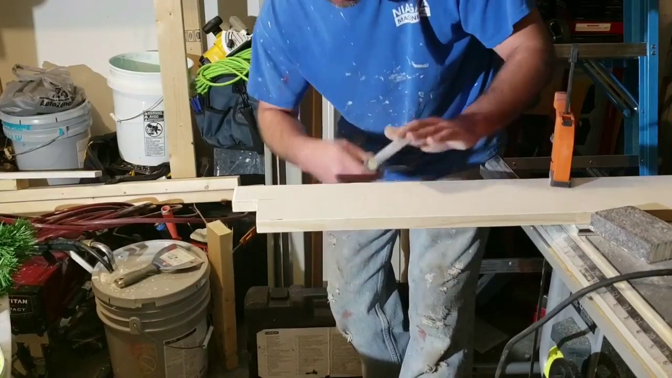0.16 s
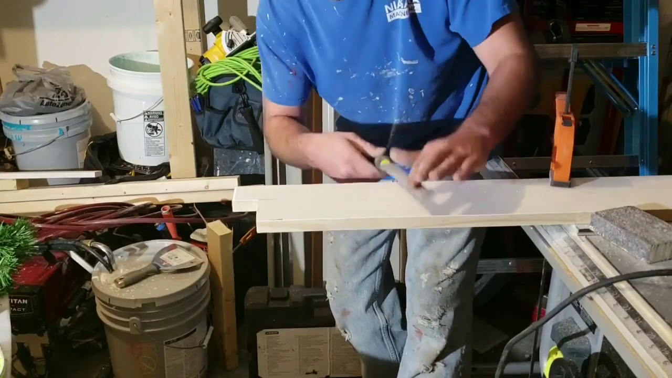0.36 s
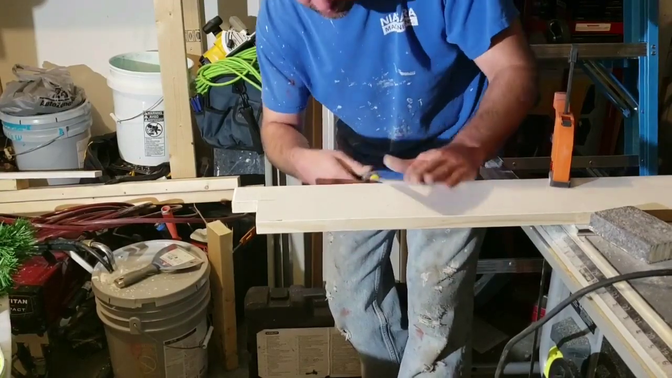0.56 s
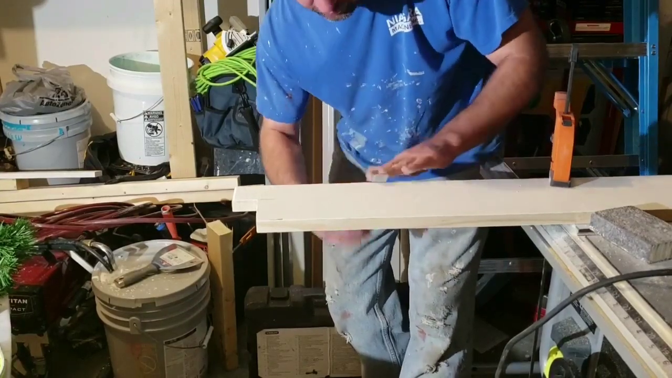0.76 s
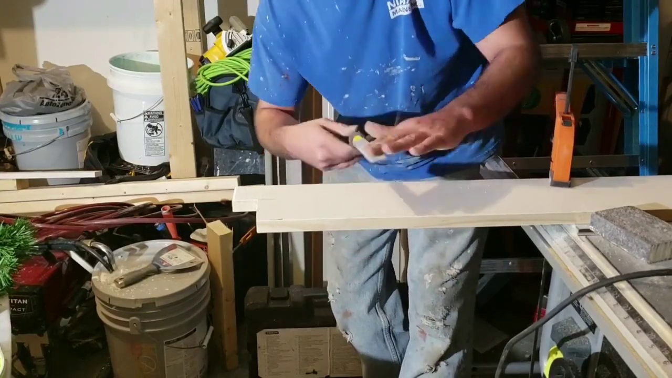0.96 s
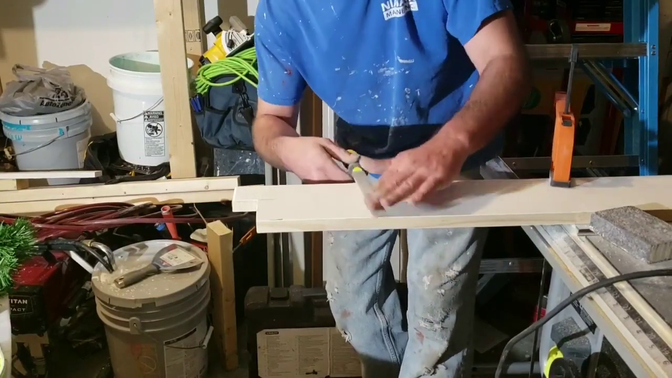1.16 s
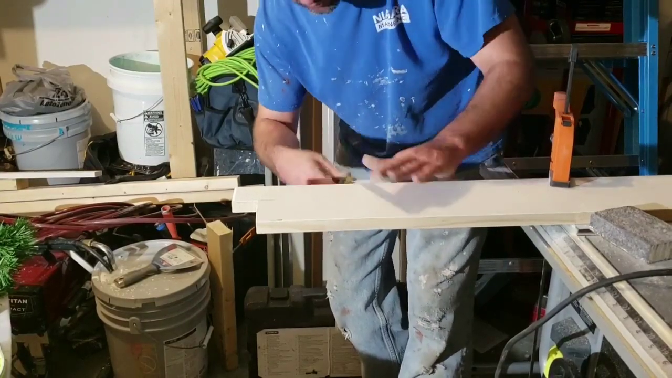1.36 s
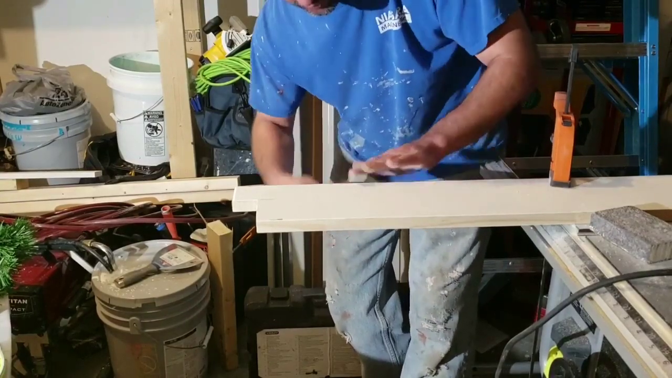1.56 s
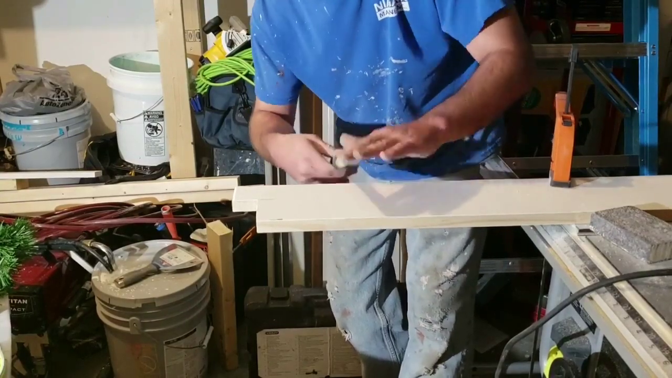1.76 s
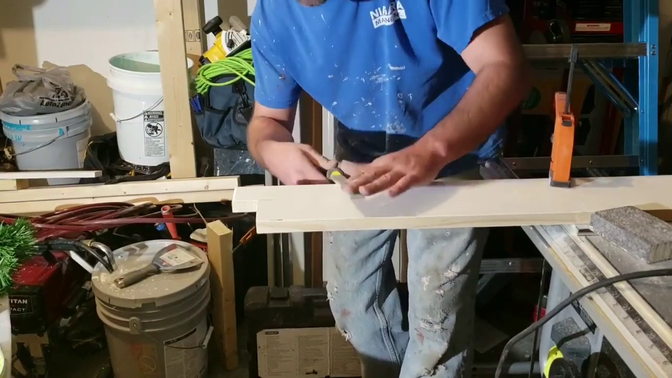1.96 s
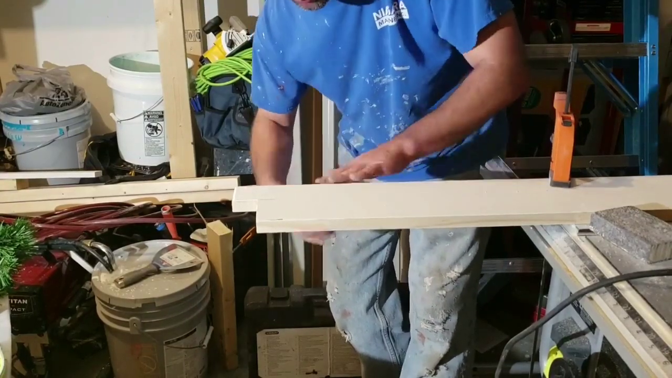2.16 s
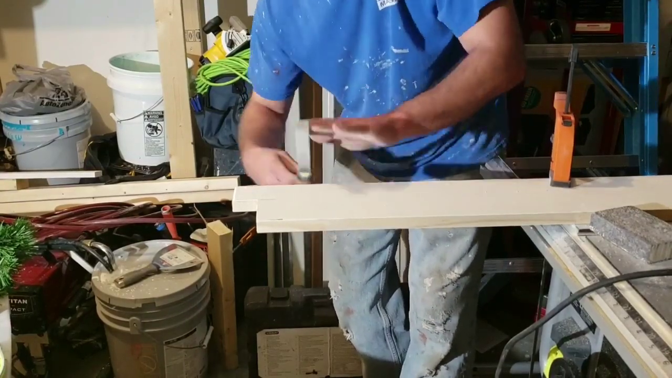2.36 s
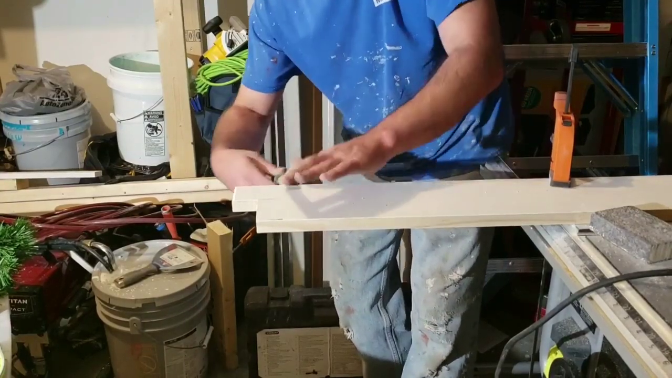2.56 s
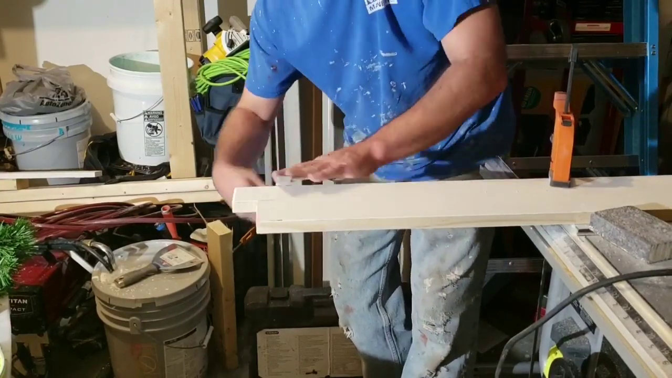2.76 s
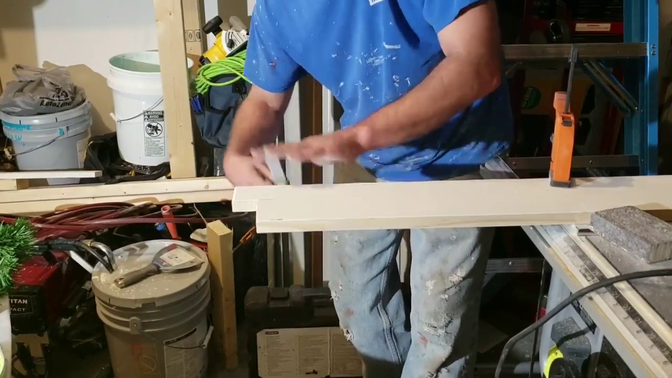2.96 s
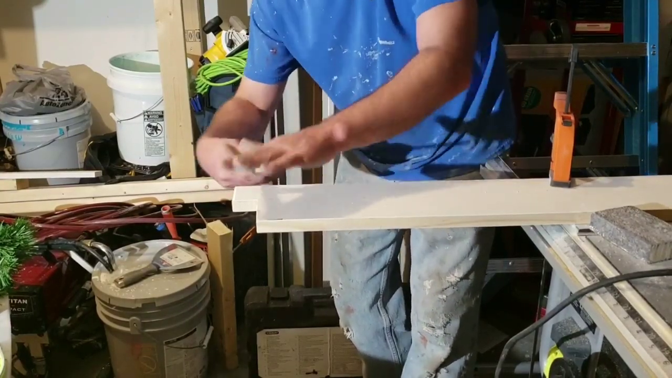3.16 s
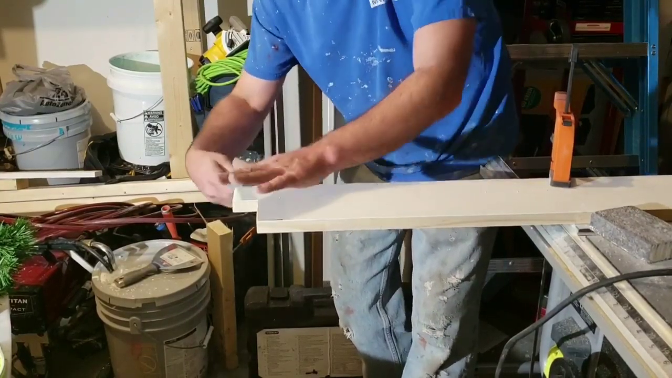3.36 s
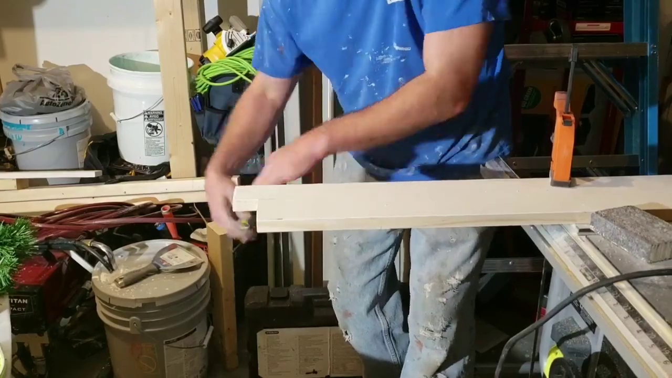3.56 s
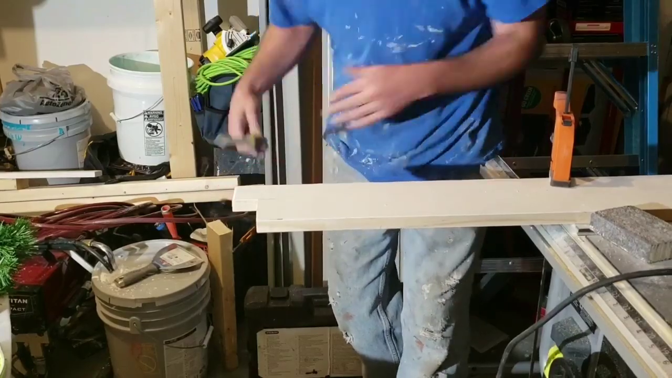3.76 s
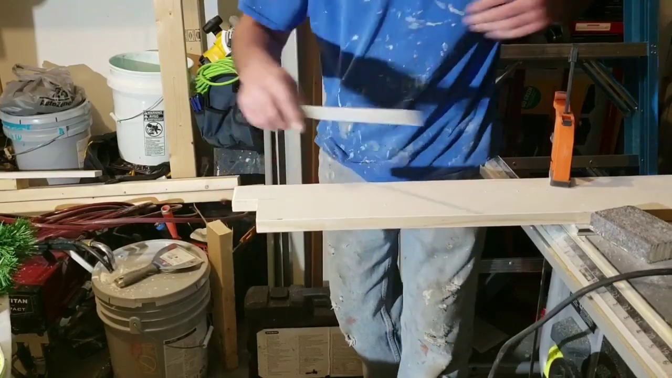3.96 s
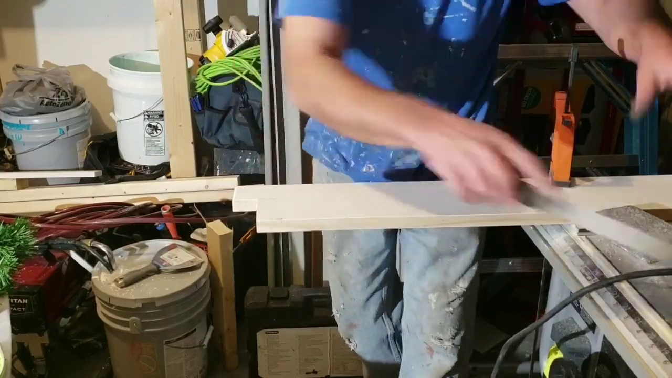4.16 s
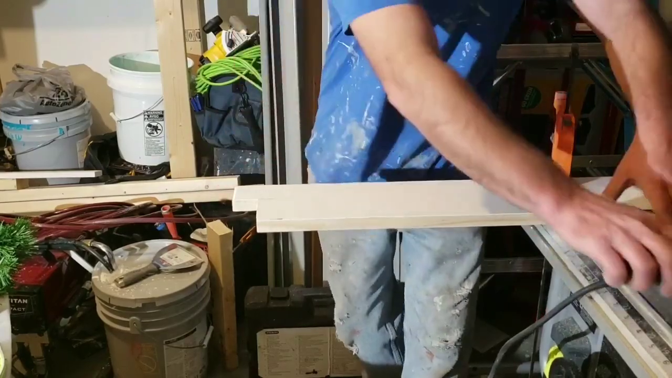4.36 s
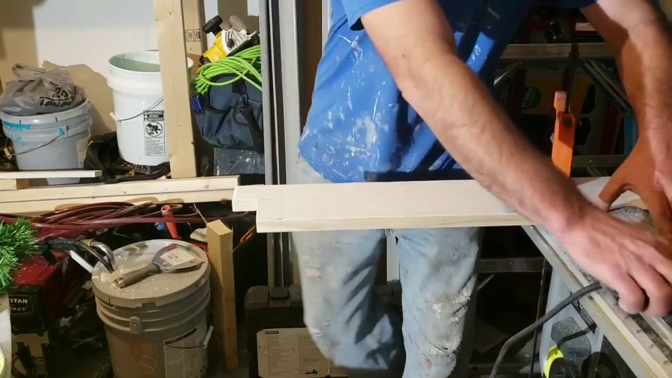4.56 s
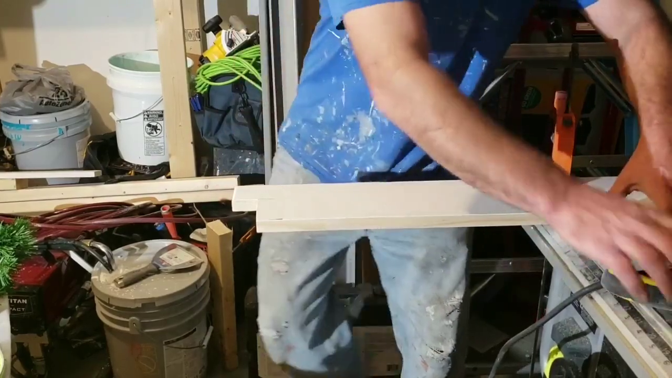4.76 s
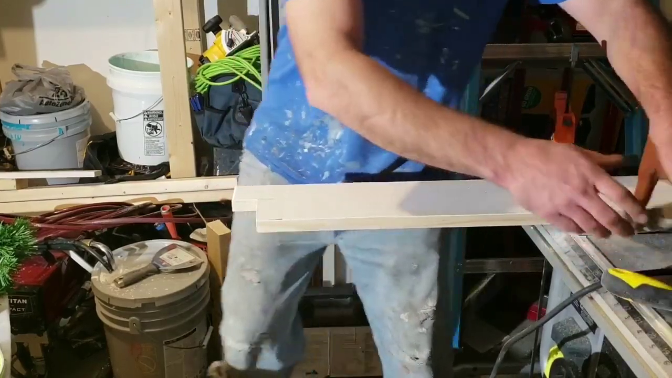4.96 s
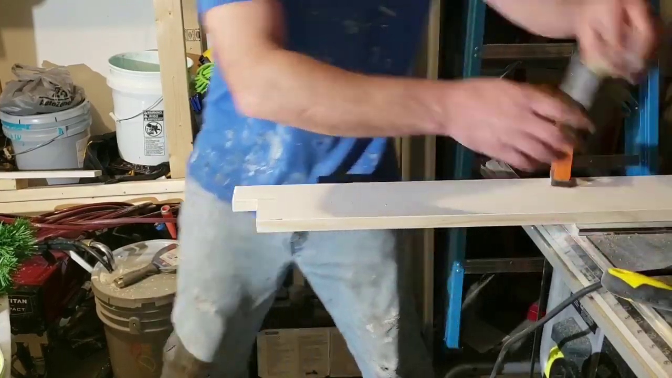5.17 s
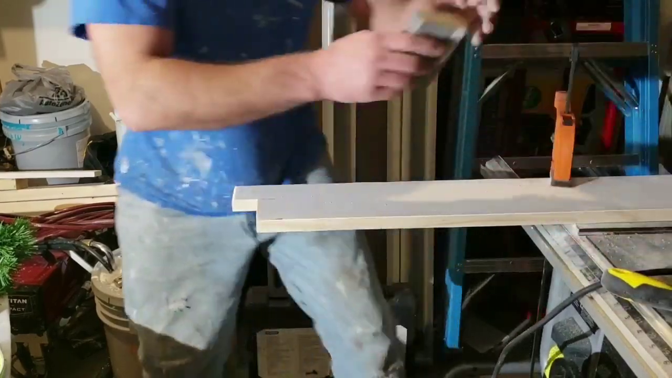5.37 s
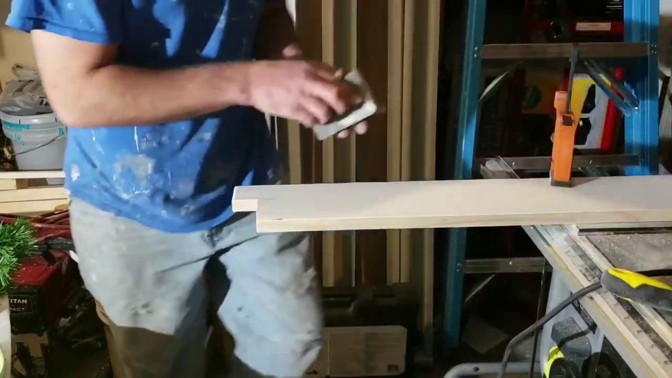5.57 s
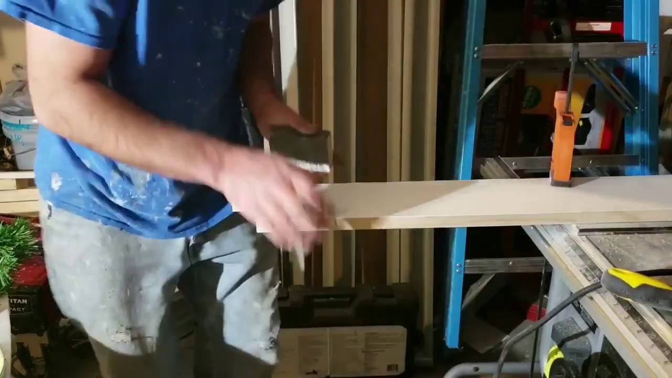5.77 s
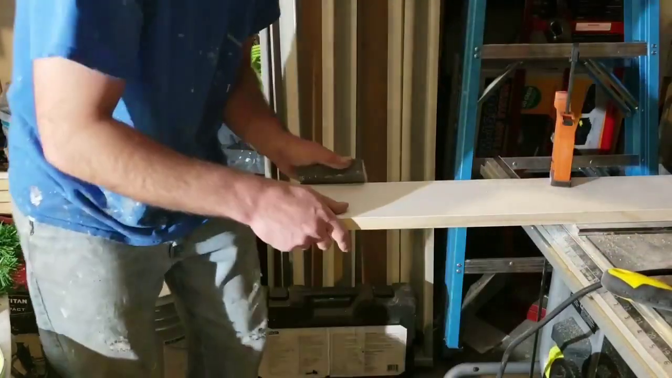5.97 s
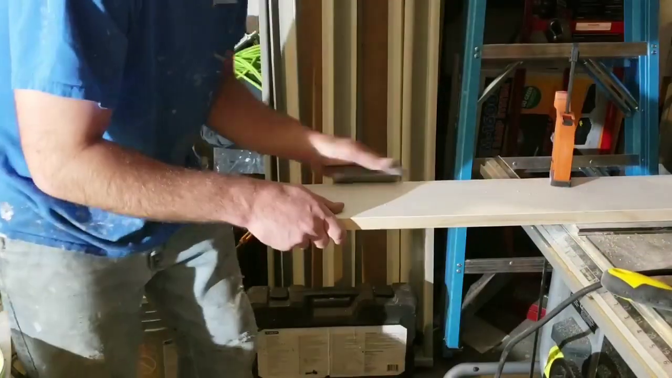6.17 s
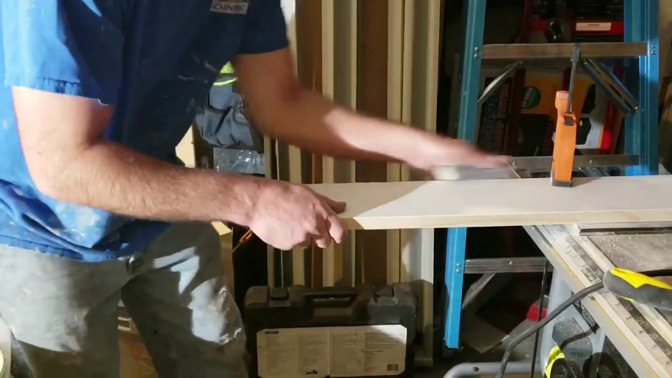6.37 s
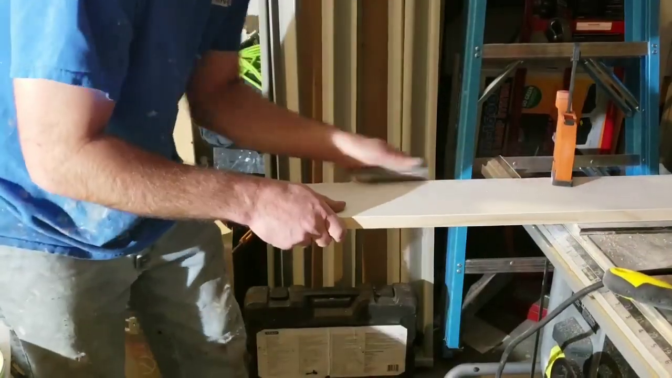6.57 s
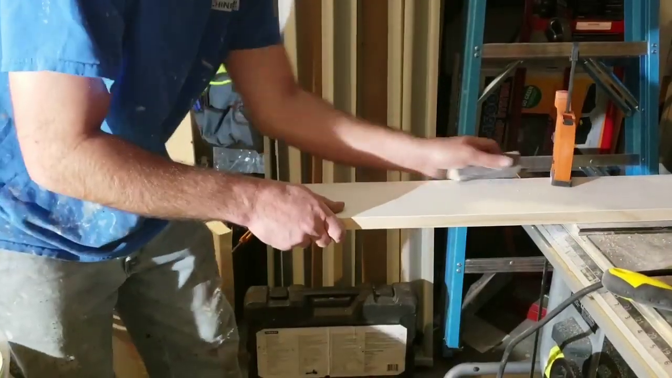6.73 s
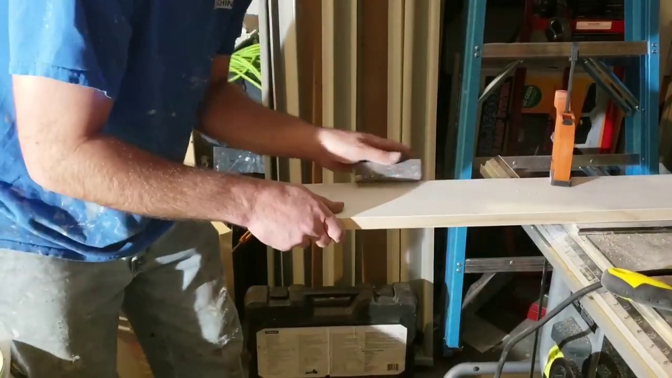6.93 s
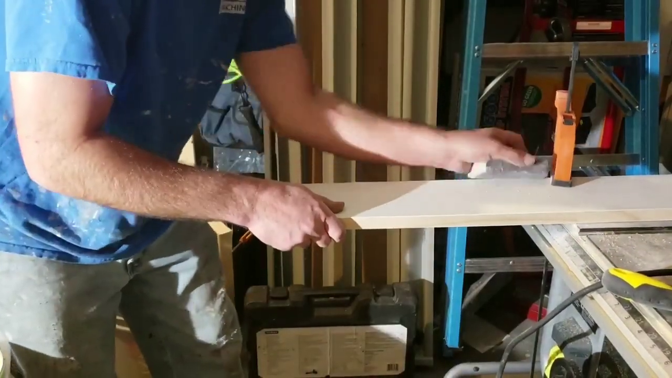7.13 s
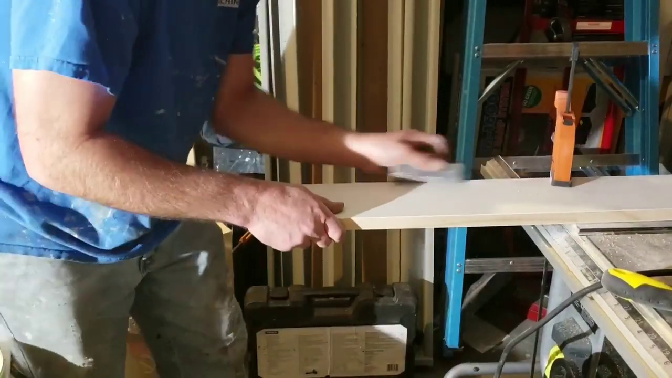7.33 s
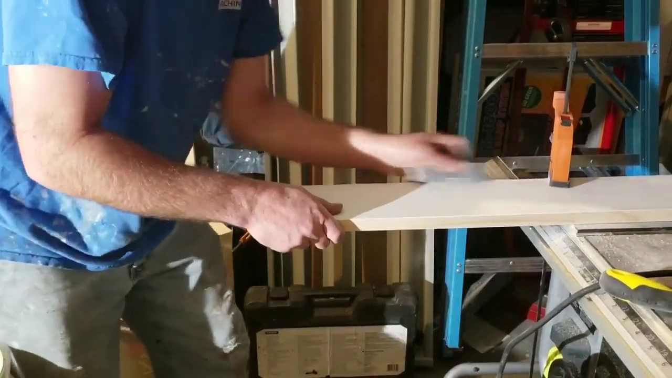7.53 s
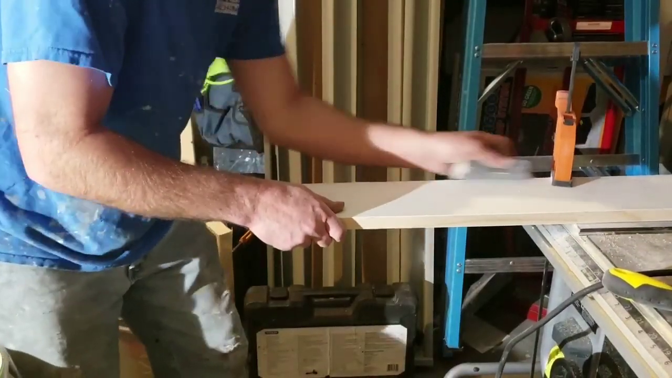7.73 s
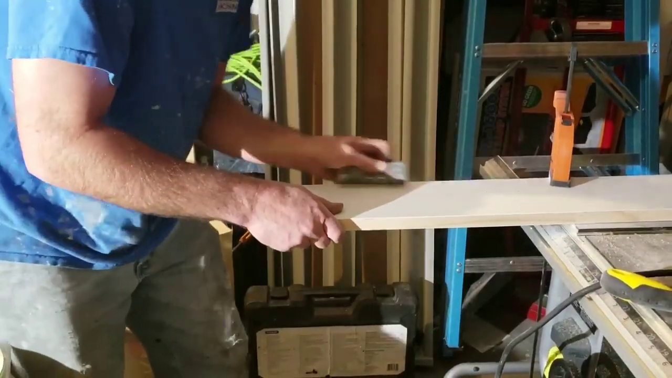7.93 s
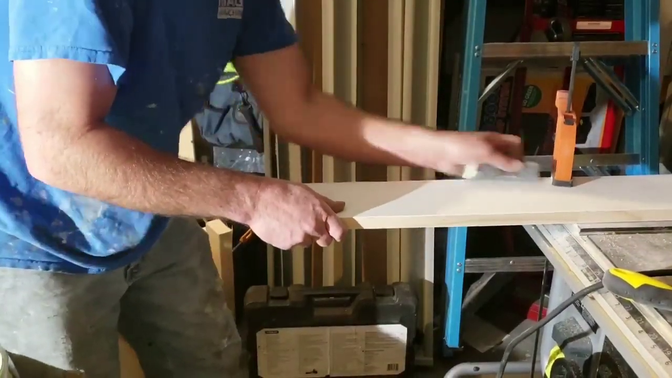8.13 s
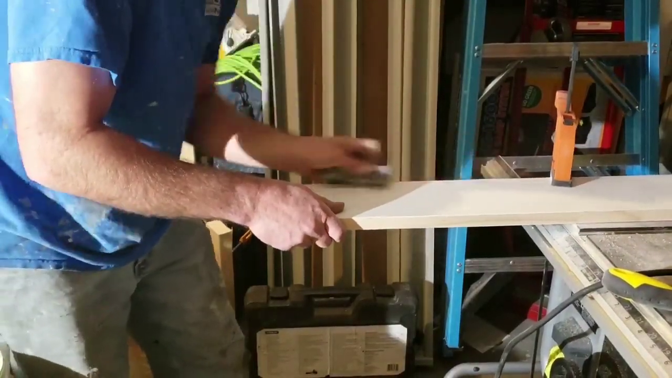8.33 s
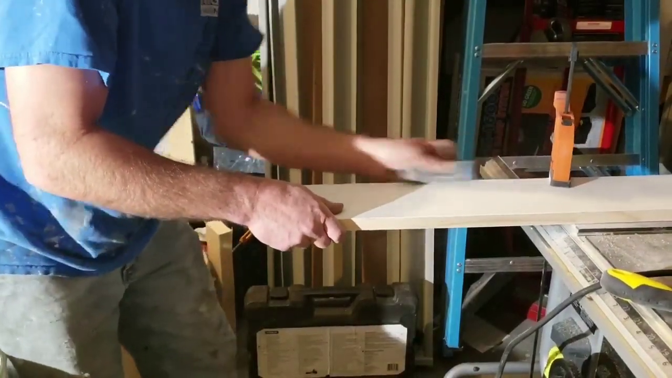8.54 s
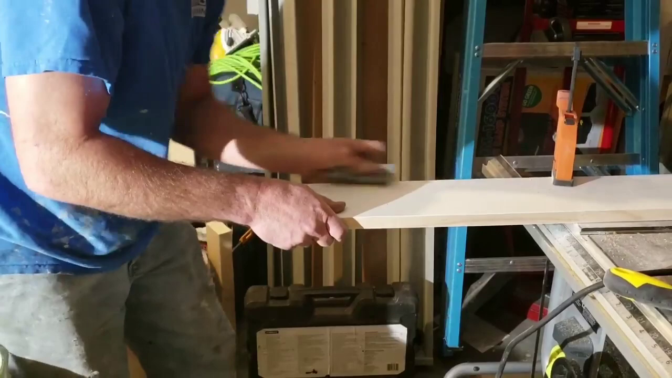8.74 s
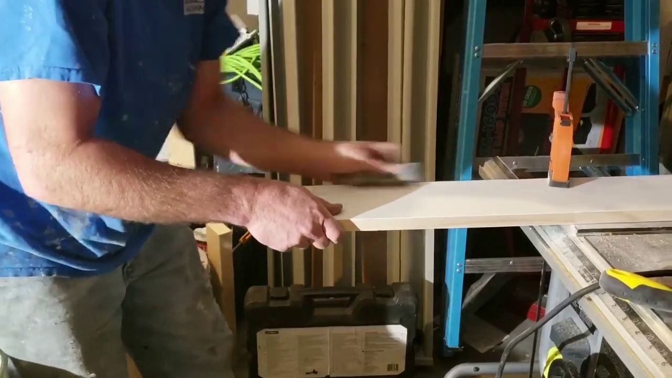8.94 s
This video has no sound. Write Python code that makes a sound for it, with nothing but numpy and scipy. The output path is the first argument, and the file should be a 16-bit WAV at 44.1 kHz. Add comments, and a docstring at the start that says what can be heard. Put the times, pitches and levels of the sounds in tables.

```python
"""Sanding a board in a garage

An abrasive stick is pushed six times along the edge of a clamped board, then dropped on the bench.
A sanding block is picked up and swept quickly to and fro over the board's face.
Grit catches the wood fibres and makes the board ring and sometimes chatter. A far-off engine hums."""
import sys
import numpy as np
from scipy import signal
from scipy.fft import rfft, irfft, next_fast_len
from scipy.io import wavfile
from scipy.ndimage import uniform_filter1d, map_coordinates

SR = 44100
rng = np.random.default_rng(int(sys.argv[2]) if len(sys.argv) > 2 else 0)


def inscribe(sig):
    """Save sig as 16-bit PCM at rate SR to the path in sys.argv[1].

    A 1-D sig is mono; a 2-D sig holds one channel per row.
    Samples are clipped to [-1, 1] before scaling.
    """
    pcm = np.round(np.clip(np.atleast_2d(sig).T, -1, 1) * 32767)
    wavfile.write(sys.argv[1], SR, pcm.astype(np.int16))


N = 396889
TIME = np.arange(N) / SR
FFT_SIZE = next_fast_len(N + SR)
FREQ = np.arange(FFT_SIZE // 2 + 1) * SR / FFT_SIZE + 1e-3


# The board's overall tone: pitch_hz, level_db
BOARD_TONE = [(150, -40), (240, -19.5), (480, -9.5), (800, -21.5), (1080, -12.5), (1600, -11.5),
              (4400, -16.5), (5500, -20.5), (7000, -28.5), (8000, -31.5), (9500, -28.5), (12000, -24),
              (15000, -30)]
# The pitches at which the board rings: pitch_hz, width_hz, level_db
BOARD_RINGS = [(250.6, 26.5, -4.5), (344.5, 58, -1.5), (462, 65, -8), (596, 83, -8), (720, 140, -8),
               (848, 53, -4), (1310, 100, -12.5), (1804, 42, -5), (2080, 99, -6), (2300, 90, -6.5),
               (2500, 51, -11.5), (2950, 21, -25), (3050, 35, -17), (3880, 180, -19.5), (4280, 70, -11),
               (6590, 460, -19)]
# Pushes of the stick (the last three columns are added to the level):
# start_s, creep_before_s, rise_s, hold_s, level_db, first_bite_db, body_db, hiss_db
PUSHES = [(0.0, .02, 0.038, 0.053, -24, -6, 3, -8), (.696, 0.13, .092, .054, -25.5, -7.5, 1.5, -3.5),
          (1.433, 0.015, 0.046, .105, -26, -8, 2, -3.5), (2.066, 0.027, 0.11, 0.083, -28, -14.5, -1, -4),
          (2.745, 0.024, 0.096, 0.062, -25.5, -20, -0.5, -6),
          (3.445, 0.043, .092, 0.083, -24, -19.5, -1, -3.5)]


def sanding_stick(creep_db=-45.5, bite_s=0.026, press_db_per_s=7.5, hiss_growth=1.19):
    """Grit scrapes the board's edge: each push creeps, bites, presses harder and lets go."""
    rasp_fade_db_per_s, body_fade_db_per_s = 340, 228
    levels = np.zeros((3, N))
    for start, creep, rise, hold, db, bite_db, body_db, hiss_db in PUSHES:
        full, end = start + rise, start + rise + hold
        lean_db = press_db_per_s * hold / 2
        stages = [start - bite_s, start, full, end]
        force_db = np.interp(TIME, stages, [creep_db - db, bite_db, -lean_db, lean_db])
        contact = np.clip((TIME - start + creep) / bite_s + 1, 0, 1)
        released_s = np.maximum(TIME - end, 0)
        low_db = force_db - body_fade_db_per_s * released_s + body_db - 1
        rasp_db = force_db - rasp_fade_db_per_s * released_s
        levels += contact * undb(db) * undb([low_db, rasp_db, hiss_growth * rasp_db + hiss_db])
    body_level, rasp_level, hiss_level = levels * undb(1.57 * wander(34.85))
    body_level *= undb(2 * wander(45.04))
    snaps = grit(per_s=5000, spread_db=2, rough_db=2)
    wood = tone(BOARD_TONE, BOARD_RINGS) * above(140)
    bands = below(1000), above(1000) * below(6000), above(6000)
    body, rasp, hiss = (unit(shape(snaps, wood * band)) for band in bands)
    # While one pitch chatters, the board's other low pitches give way a little.
    chattering = np.clip(sum(swell(s, length) for s, length, *_ in JUDDERS), 0, 1)
    body_level *= 1 - 0.17 * chattering
    return body_level * bend(body, depth=.025) + rasp_level * bend(rasp, depth=.006) + hiss_level * hiss


# The sandpaper's overall tone: pitch_hz, level_db
PAPER_TONE = [(250, -44), (380, -3), (520, -29), (680, -4.5), (880, 2.5), (1250, -4.5), (2300, 6),
              (3300, -1), (4600, -1), (5700, -3.5), (6800, -1), (8600, -7.5), (12000, 0.5), (14800, -1)]
# Moments when the paper catches and whistles: middle_s, length_s, level_change_db, whistle_db
CATCHES = [(6.4, 0.19, 4.5, -20), (6.58, .024, -1, -15), (8.408, .024, 5.5, -7), (8.908, 0.028, 4, -28)]
# Sweeps of the block, each lasting until the next: start_s, level_db, fastest_point (0 to 1)
BLOCK_SWEEPS = [(6.198, -28.5, 0.76), (6.484, -27.5, 0.68), (6.648, -27, 0.44), (6.87, -32.5, 0.42),
                (7.094, -28.5, 0.65), (7.303, -29, 0.55), (7.46, -30, 0.62), (7.605, -29, 0.61),
                (7.769, -29.5, 0.43), (7.94, -29.5, 0.6), (8.115, -29, 0.46), (8.28, -29.5, 0.68),
                (8.456, -29.5, .38), (8.631, -27.5, 0.66), (8.815, -29.5, 0.28)]


def sanding_block(end_s=9.01, lead_s=0.0072, turn_db=-53, whistle_hz=6860, whistle_width_hz=140):
    """The block stops at every turn. Moving fast it is loud and bright; moving slowly it grips."""
    usual_sweep_s, brighten_db_per_s, grip_fade_db_per_s = 0.19, 1.16, 3
    level, bright_db, speed = np.zeros((3, N))
    starts = [row[0] for row in BLOCK_SWEEPS]
    ahead, worked_s = TIME + lead_s, TIME - starts[0]
    for (start, db, fastest), end in zip(BLOCK_SWEEPS, starts[1:] + [end_s]):
        now = (ahead >= start) & (ahead < end)
        travel = np.interp((ahead[now] - start) / (end - start), [0, fastest, 1], [0, .5, 1])
        speed[now] = np.sin(np.pi * travel)
        sharpness = 1.06 * ((end - start) / usual_sweep_s) ** 1.42  # long sweeps peak more sharply
        level[now] = undb(db + 1) * speed[now] ** sharpness
        bright_db[now] = 0.8 + brighten_db_per_s * (start - starts[0]) + 4 * (speed[now] - .85)
    touching = np.clip(worked_s / 0.071, 0, 1)
    level += touching * undb(turn_db)
    level *= undb(sum(db * swell(s, length) for s, length, db, _ in CATCHES))
    snaps = grit(per_s=6000, spread_db=3.5, rough_db=1)
    hiss = unit(shape(snaps, tone(PAPER_TONE) * above(460, order=3)))
    treble = shape(hiss, above(3700, order=3))
    paper = treble * undb(bright_db) + (hiss - treble) * undb(-bright_db)
    wood = tone(BOARD_TONE, BOARD_RINGS) * above(290)
    ringing = bend(unit(shape(snaps, wood * above(1250, order=3))), depth=.02)
    grip = unit(shape(snaps, wood * below(850))) * np.sqrt(speed) * (1 - speed ** 2)
    grip *= undb(3.2 * wander(12) - grip_fade_db_per_s * worked_s)  # smoother wood grips less
    whistle = unit(shape(snaps, 1 / (1 + ((FREQ - whistle_hz) / whistle_width_hz) ** 2) ** 2))
    whistle *= sum(undb(db) * swell(s, length) for s, length, _, db in CATCHES)
    return level * (paper + undb(-17) * ringing + whistle) + undb(-44) * grip


# Moments when the stick judders on the board: middle_s, length_s, pitch_hz, level_db
JUDDERS = [(.008, .035, 324, -25.5), (.103, 0.024, 293.2, -22), (0.765, .013, 333, -28.5),
           (0.805, 0.04, 864, -22.5), (0.846, 0.018, 318, -17.5), (0.886, 0.027, 255, -28.5),
           (1.511, 0.051, 329, -26), (1.62, 0.021, 265, -29), (2.209, 0.038, 342.7, -19),
           (2.873, .06, 333, -28), (3.532, 0.024, 600, -22), (3.619, .015, 717, -27.5)]


def chatter(waver=0.0251, rasp_db=-12, pressed_sag_per_s=.3, released_sag_per_s=4.5):
    """The stick grabs and slips at one board pitch, which sags as the hand lets go. Each slip rasps."""
    snaps = grit(per_s=6000, spread_db=0, rough_db=8)
    scrape = undb(rasp_db) * unit(shape(snaps, tone(BOARD_TONE) * above(1100)))
    pressed = sum((TIME >= s) & (TIME < s + rise + hold) for s, _, rise, hold, *_ in PUSHES)
    sag = np.cumsum(np.where(pressed, pressed_sag_per_s, released_sag_per_s)) / SR
    drift = 1 + waver * wander(120)
    out = np.zeros(N)
    for s, length, hz, db in JUDDERS:
        wave = sine(hz * drift * (1 + np.interp(s, TIME, sag) - sag))
        out += undb(db) * swell(s, length) * (np.sqrt(2) * wave + scrape * np.maximum(wave, 0))
    return out


# The bench's overall tone: pitch_hz, level_db
BENCH_TONE = [(150, -44), (300, -24), (850, -16), (1150, -16), (1700, -13), (4000, -17), (7000, -18.5),
              (8500, -23.5), (11000, -22.5), (15000, -28)]
# The pitches at which the bench and stick ring together: pitch_hz, width_hz, level_db
BENCH_RINGS = [(272, 31, -9.5), (371, 23.5, 5), (399, 34, 1.5), (590, 44, -11.5), (776, 240, -7),
               (1646, 170, -7.5), (2102, 31, -5), (2350, 34, -4), (2550, 69, -6.5), (3080, 26, -4),
               (3730, 25, -3), (5430, 150, -14)]
# The landing and its bounces: start_s, thud_db, click_above_thud_db
BOUNCES = [(4.505, -19, 1.5), (4.513, -32, -6), (4.523, -25, -0.5), (4.553, -35.5, 11), (4.572, -26.5, -2),
           (4.692, -38, -20), (4.707, -30, 1), (4.874, -44.5, 0.5)]


def dropped_stick():
    """The stick lands and bounces, making the bench ring."""
    return blows(BOUNCES, tone(BENCH_TONE, BENCH_RINGS) * above(200), gain_db=2, split_hz=1150)


# Knocks on the board: start_s, thud_db, click_above_thud_db
BOARD_KNOCKS = [(.542, -29.5, -5.5), (1.302, -33, -10.5), (1.988, -24, -15.5), (2.694, -38, -2.5),
                (3.375, -35, -3.5), (5.225, -51, -6), (5.772, -42.5, -3.5), (6.432, -23, -3),
                (6.724, -31, -11), (7.613, -40.5, 1), (8.144, -38.5, -7)]


def knocks():
    """The stick and block knock against the board and make it ring."""
    return blows(BOARD_KNOCKS, tone(BOARD_TONE, BOARD_RINGS) * above(243), gain_db=-1.5, split_hz=1160)


# Soft bumps of hand and block on the board: middle_s, length_s, pitch_hz, level_db
SOFT_BUMPS = [(1.335, 0.039, 420, -41), (5.8, 0.025, 656, -46), (6.092, 0.015, 374, -43.5),
              (6.132, 0.042, 256, -49.5), (6.439, 0.042, 710, -31), (6.46, 0.052, 382, -29),
              (6.742, 0.045, 420, -36.5), (7.514, 0.052, 664, -41.5), (8.147, 0.014, 820, -31),
              (8.83, 0.019, 690, -38)]


def bumps(breadth=0.52):
    """A soft touch skids briefly and stirs only a band of the board's lower pitches."""
    noise = rng.standard_normal(N)
    out = np.zeros(N)
    for s, length, hz, db in SOFT_BUMPS:
        band = 1 / (1 + (np.log(FREQ / hz) / breadth) ** 4)
        out += undb(db) * swell(s, length) * unit(shape(noise, band))
    return out


# The rustle's overall tone: pitch_hz, level_db
RUSTLE_TONE = [(200, -15), (800, 0.5), (1300, -7), (4200, -5), (7000, -7.5), (8500, -12.5), (13000, -7.5),
               (15000, -13)]
# Hands, tools and clothes brush past things: middle_s, length_s, level_db
RUSTLES = [(1.35, 0.037, -53.5), (3.79, .11, -53), (4.247, .05, -68), (4.455, .03, -67),
           (5.088, 0.075, -51.5), (5.145, 0.02, -49.5), (5.428, 0.059, -54), (5.922, 0.061, -48.5),
           (6.098, .11, -53.5)]


def rustling(tool_change_s=5.17, tool_change_db=-66):
    """Skin and cloth slide softly over tools and wood."""
    snaps = grit(per_s=3900, spread_db=2, rough_db=2.5)
    rustle = unit(shape(snaps, tone(RUSTLE_TONE) * above(200)))
    reaching = swell(tool_change_s, length_s=1) * undb(tool_change_db + 3 * wander(15))
    return rustle * (reaching + sum(undb(db) * swell(s, length) for s, length, db in RUSTLES))


# How loud the engine is over time: time_s, level_db
ENGINE_LEVELS = [(0, -56.5), (1.5, -67), (2.5, -56.5), (3.15, -46.5), (5.15, -52.5), (6, -62), (6.5, -51),
                 (7.5, -63), (9, -60.5)]


def engine(pitch_hz=127.3, waver=.01, gain_db=-2):
    """A far-off engine hums unsteadily, swelling and fading."""
    hum = np.sqrt(2) * sine(pitch_hz * (1 + waver * wander(10))) * undb(2 * wander(18))
    return hum * undb(np.interp(TIME, *np.transpose(ENGINE_LEVELS)) + gain_db)


# The tone of the still air: pitch_hz, level_db
AIR_TONE = [(100, 9), (160, 1.5), (240, 2), (300, -5), (380, -1.5), (500, -11), (800, -9.5), (2000, -13.5),
            (3000, -23), (5000, -29.5), (8500, -32), (11000, -31.5), (14000, -26)]
# The tone of the rumble: pitch_hz, level_db
RUMBLE_TONE = [(15, -38), (30, -22), (40, -1.5), (54, 0.5), (66, 3.5), (82, -4.5), (100, -7.5), (160, -12),
               (400, -64)]
# How loud the rumble is over time: time_s, level_db
RUMBLE_LEVELS = [(0, -55), (4.4, -53.5), (5.1, -64), (6.1, -58), (6.5, -51.5), (7.2, -56.5), (9, -56)]


def room_noise(air_db=-57.5):
    """Still air makes a steady hush over a low rumble that slowly rises and falls."""
    air = wide_noise(tone(AIR_TONE) * above(89, order=3))
    rumble = wide_noise(tone(RUMBLE_TONE) * below(250))
    return air * undb(air_db) + rumble * undb(np.interp(TIME, *np.transpose(RUMBLE_LEVELS)))


def grit(per_s, spread_db, rough_db):
    """Grains snap through fibres: many uneven clicks, stronger where the surface is rough."""
    snaps = (rng.random(N) < per_s / SR) * rng.standard_normal(N)
    return snaps * undb(spread_db * rng.standard_normal(N)) * undb(rough_db * wander(260))


def bend(x, depth):
    """The hand's pressure on the board makes its pitches glide a little."""
    place = np.cumsum(1 + depth * np.clip(wander(9), -2, 2))
    return map_coordinates(x, [place], order=3, mode="mirror")


def wood_patches(x, spread_db, count=10):
    """Each patch of wood favours other pitches, so the tone shifts from stroke to stroke."""
    place = np.interp(np.log(FREQ), np.log([500, 14000]), [0, count - 1])
    bands = (np.maximum(1 - np.abs(place - k), 0) for k in range(count))
    return sum(shape(x, band) * undb(spread_db * wander(8)) for band in bands)


def blows(table, body, gain_db, split_hz, soft_contact_s=.00005, soft_db=-41):
    """A blow's weight makes a thud and its hardness a click. Soft blows push longer and sound duller."""
    thuds, clicks = np.zeros((2, N))
    t = TIME[:SR // 500]
    for s, db, hard_db in table:
        at = int(s * SR)
        contact_s = soft_contact_s * undb(0.5 * (soft_db - db - hard_db))
        push = np.exp(-t / contact_s)
        thuds[at] = undb(db + gain_db)
        clicks[at:at + len(t)] += undb(db + hard_db + gain_db) * push / push.sum()
    low, high = ring(body * below(split_hz, order=4)), ring(body * above(split_hz, order=2))
    return shape(thuds, low) + shape(clicks, high)


def garage(x, direct_db, early_db, late_db, count=4):
    """The bass arrives straight, while the echoes drift as the hands pass different spots."""
    spots = np.array([wander(5) for _ in range(count)]) ** 2
    spots /= np.sqrt(np.sum(spots ** 2, axis=0))
    direct = shape(x, undb(direct_db) + (1 - undb(direct_db)) * below(321, order=3))
    echoed = (signal.oaconvolve((x * share)[None], echoes(early_db, late_db), axes=1) for share in spots)
    return direct + sum(echoed)[:, :N]


def echoes(early_db, late_db, bass_hz=480, boom_db=-6):
    """The echoes at one spot: shelves answer at once, walls linger, and little bass comes back."""
    t = TIME[:SR * 3 // 5]
    near, far, airy = rng.standard_normal((3, 2, len(t)))
    def tail(noise, fade_s, gap_s):
        echo = noise * undb(-60 * t / fade_s) * (t > gap_s)
        return echo / np.sqrt(np.sum(echo ** 2, axis=1, keepdims=True))
    def keep(echo, hz, side):
        return signal.sosfilt(signal.butter(3, hz, side, fs=SR, output="sos"), echo)
    shelves = tail(near, fade_s=0.1, gap_s=0.00088)
    walls = keep(tail(far, fade_s=0.34, gap_s=0.016), 5200, "low")
    walls += keep(tail(airy, fade_s=0.25, gap_s=0.0067), 5400, "high")
    boom = undb(late_db + boom_db) * keep(walls[0], bass_hz, "low")
    return keep(undb(early_db) * shelves + undb(late_db) * walls, bass_hz, "high") + boom


def wide_noise(gain, bass_side_db=-10):
    """Stereo noise whose treble spreads wider than its bass."""
    mid, side = (unit(shape(rng.standard_normal(N), gain)) for _ in range(2))
    side = shape(side, np.maximum(undb(bass_side_db), 1.12 * above(620, order=2)))
    return mid + np.array([side, -side])


def undb(db):
    """Turn decibels into a number to multiply by."""
    return 10 ** (np.asarray(db) / 20)


def unit(x):
    """Scale a sound to an average power of 1."""
    return x / np.sqrt(np.mean(x ** 2))


def sine(hz):
    """A pure tone that follows a changing pitch."""
    return np.sin(2 * np.pi * np.cumsum(hz) / SR)


def shape(x, gain):
    """Filter a sound: turn each frequency up or down."""
    return irfft(rfft(x, FFT_SIZE) * gain, FFT_SIZE)[..., :N]


def tone(points, rings=()):
    """A filter made of a broad curve plus a peak for each ringing pitch."""
    hz, db = np.transpose(points)
    power = undb(np.interp(np.log(FREQ), np.log(hz), db)) ** 2
    for pitch, width, peak_db in rings:
        distance = (FREQ - pitch ** 2 / FREQ) / (1.55 * width)
        power += undb(peak_db) ** 2 / (1 + distance ** 2) ** 2
    return np.sqrt(power)


def above(hz, order=8):
    """A filter that keeps what is above hz."""
    return 1 / np.sqrt(1 + (hz / FREQ) ** (2 * order))


def below(hz, order=8):
    """A filter that keeps what is below hz."""
    return 1 / np.sqrt(1 + (FREQ / hz) ** (2 * order))


def ring(gain):
    """Make a filter ring only after a blow, with a power of 1 over the first 10 ms."""
    cepstrum = irfft(np.log(gain + gain.max() / 10 ** 4), FFT_SIZE)
    cepstrum[1:FFT_SIZE // 2] *= 2
    cepstrum[FFT_SIZE // 2:] = 0
    response = np.exp(rfft(cepstrum))
    return response / np.std(irfft(response, FFT_SIZE)[:SR // 100])


def wander(per_s):
    """Glide between random values, mostly between -1 and 1."""
    step = int(SR / per_s)
    held = np.repeat(rng.standard_normal(N // step + 1), step)
    return 1.2 * uniform_filter1d(held, step)[:N]


def swell(middle_s, length_s):
    """A smooth rise and fall, length_s wide at half its height."""
    out, near = np.zeros(N), np.abs(TIME - middle_s) < length_s
    out[near] = np.cos(np.pi / 2 * (TIME[near] - middle_s) / length_s) ** 2
    return out


def pan(x, left_db):
    """Place a sound left or right of the centre."""
    return x * undb(np.array([[left_db], [-left_db]]) / 2)


def scene():
    """The work on the board and the clatter on the bench share one small room."""
    stick = wood_patches(sanding_stick(), spread_db=1.63)
    edge = garage(stick, direct_db=-7, early_db=0.5, late_db=-13.5)
    board = garage(chatter() + knocks(), direct_db=-5, early_db=2.5, late_db=-6, count=1)
    block = wood_patches(sanding_block(), spread_db=1.5)
    face = garage(block + bumps() + rustling(), direct_db=-10.5, early_db=0.5, late_db=-9.5)
    bench = garage(dropped_stick(), direct_db=-13.5, early_db=1, late_db=-4.5, count=2)
    return pan(edge + board + face, left_db=-1.3) + pan(bench, left_db=-2) + room_noise() + engine()


def record(dry):
    """A steep filter cuts off the highest treble."""
    top_hz = 14850
    return signal.sosfilt(signal.ellip(10, .2, 75, top_hz, fs=SR, output="sos"), dry)


dry = scene()
out = record(dry)
inscribe(out)
```